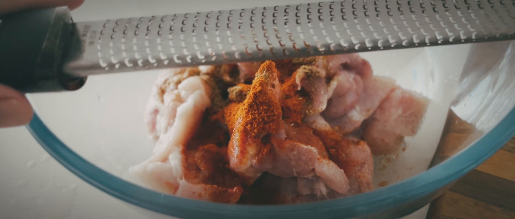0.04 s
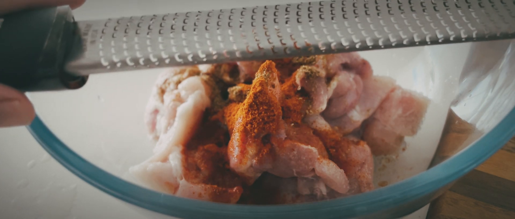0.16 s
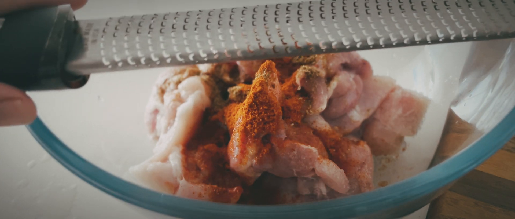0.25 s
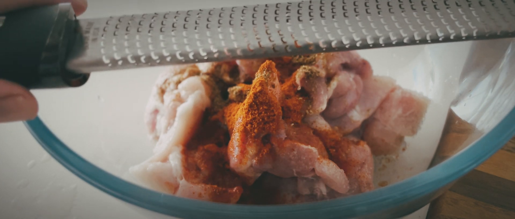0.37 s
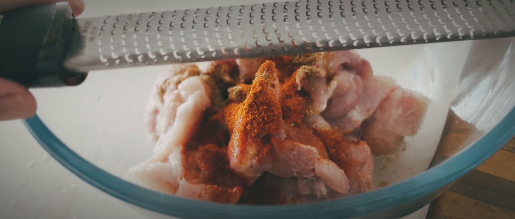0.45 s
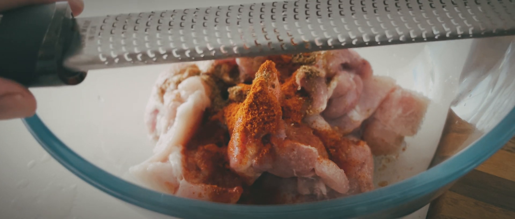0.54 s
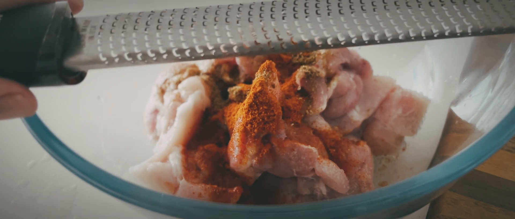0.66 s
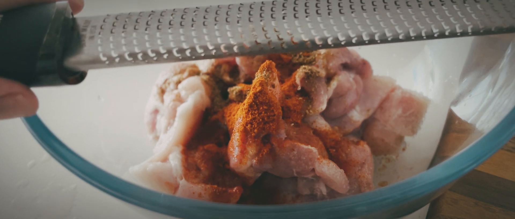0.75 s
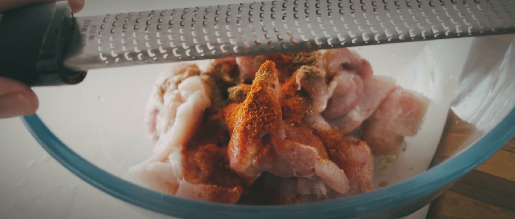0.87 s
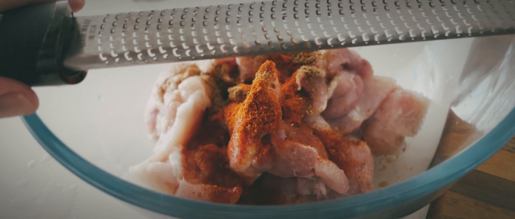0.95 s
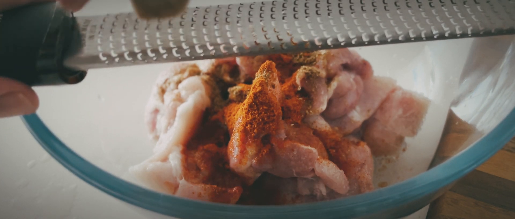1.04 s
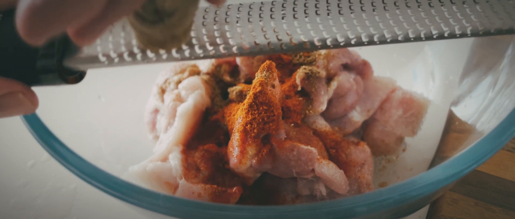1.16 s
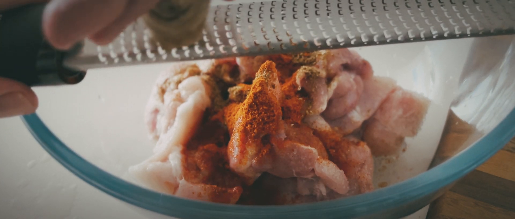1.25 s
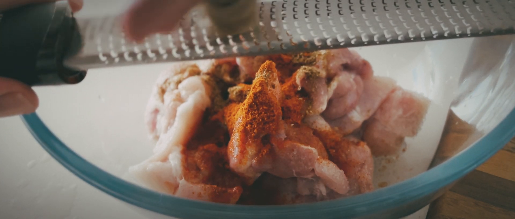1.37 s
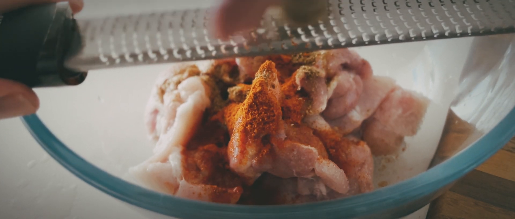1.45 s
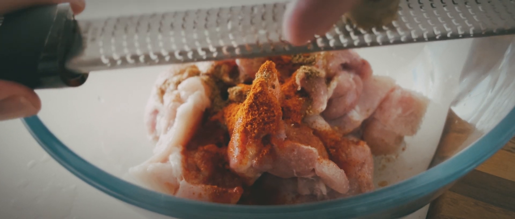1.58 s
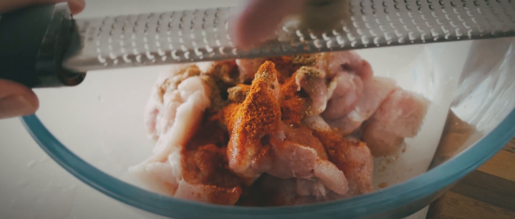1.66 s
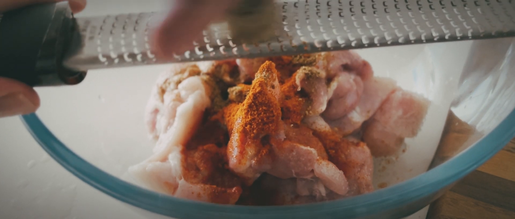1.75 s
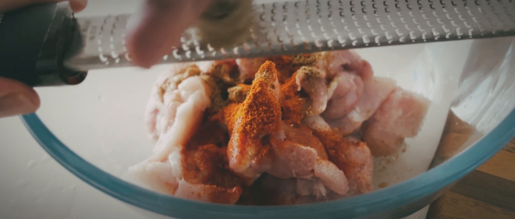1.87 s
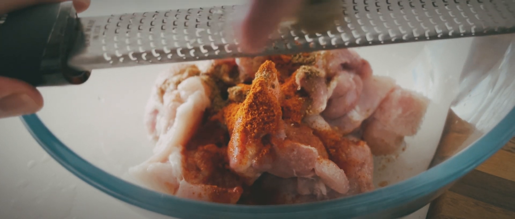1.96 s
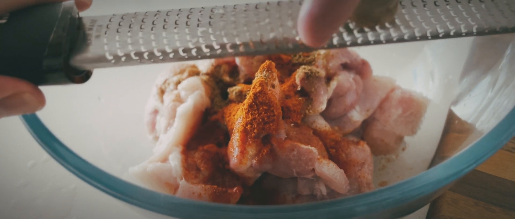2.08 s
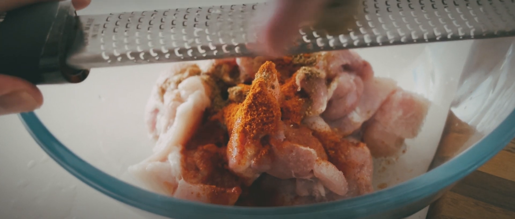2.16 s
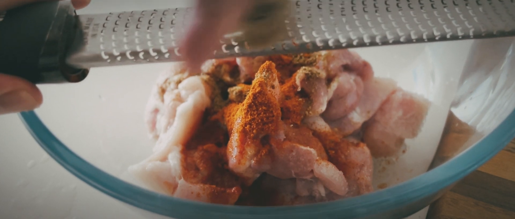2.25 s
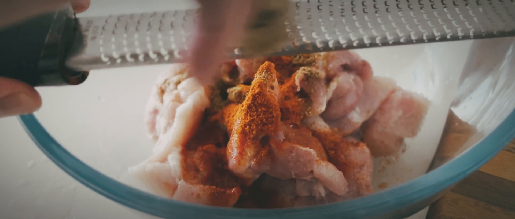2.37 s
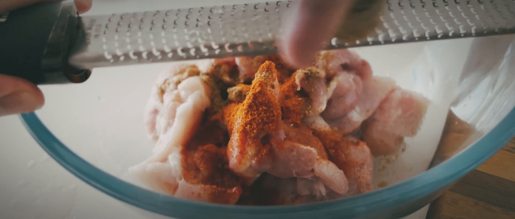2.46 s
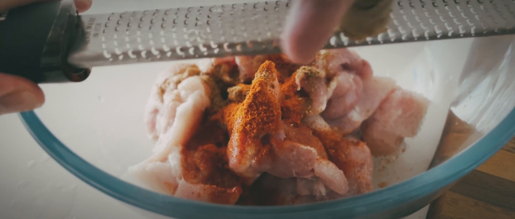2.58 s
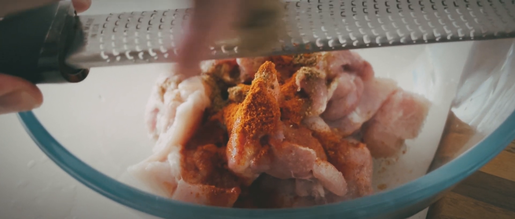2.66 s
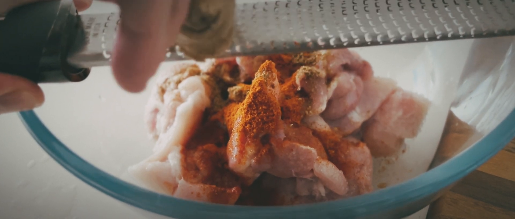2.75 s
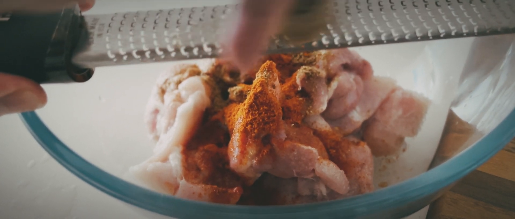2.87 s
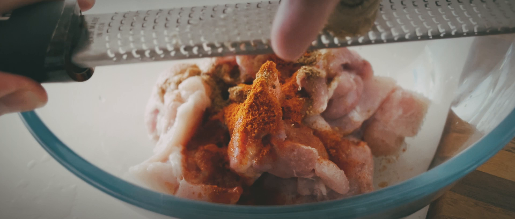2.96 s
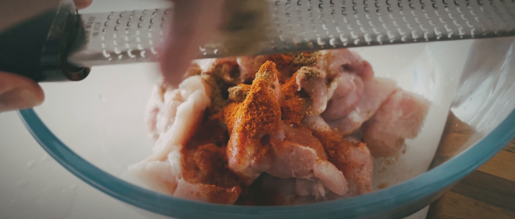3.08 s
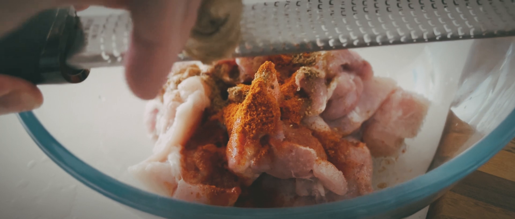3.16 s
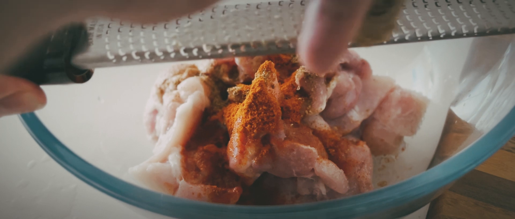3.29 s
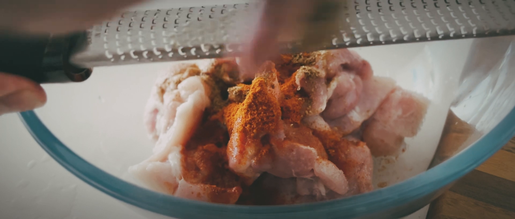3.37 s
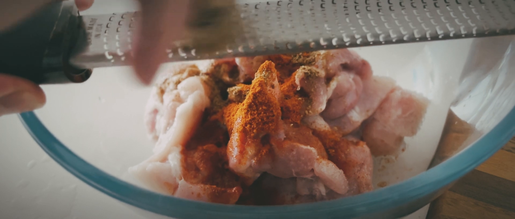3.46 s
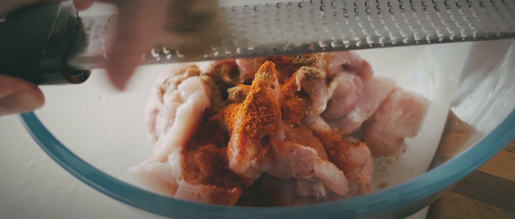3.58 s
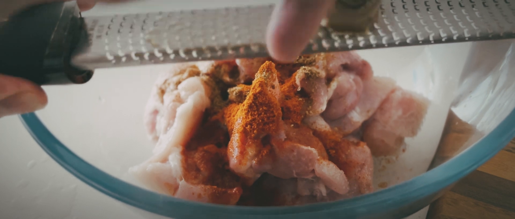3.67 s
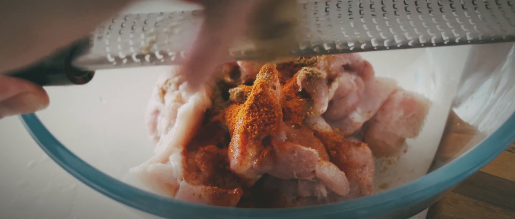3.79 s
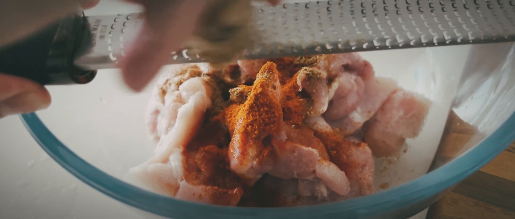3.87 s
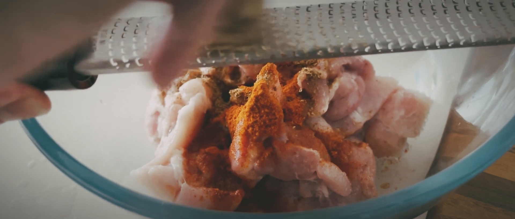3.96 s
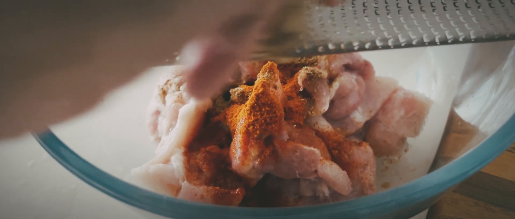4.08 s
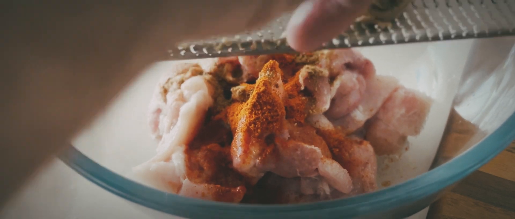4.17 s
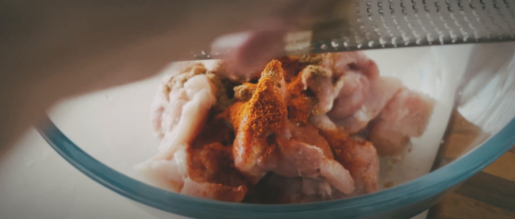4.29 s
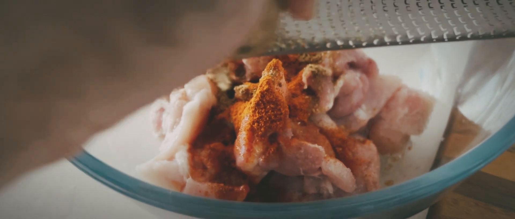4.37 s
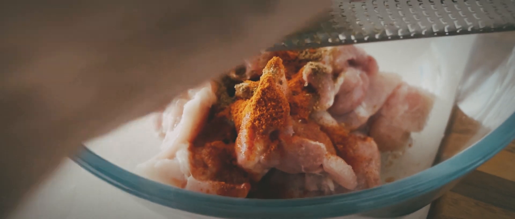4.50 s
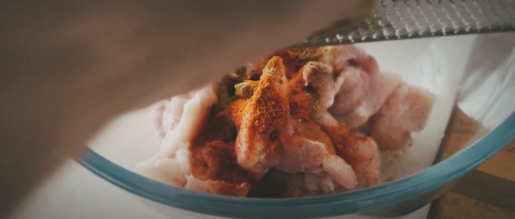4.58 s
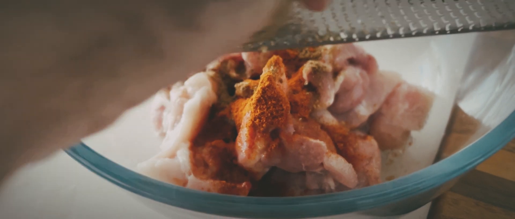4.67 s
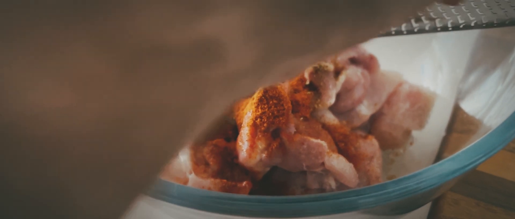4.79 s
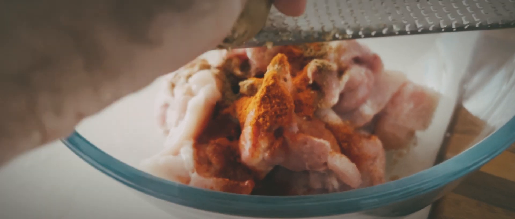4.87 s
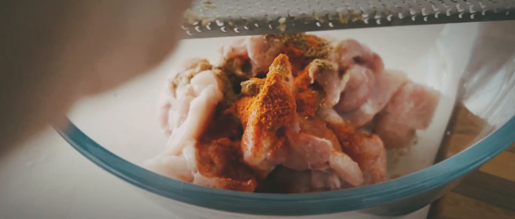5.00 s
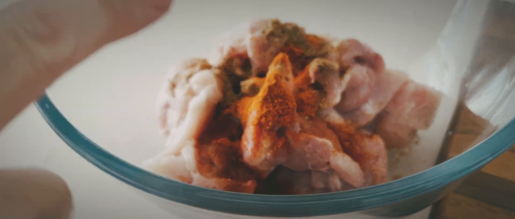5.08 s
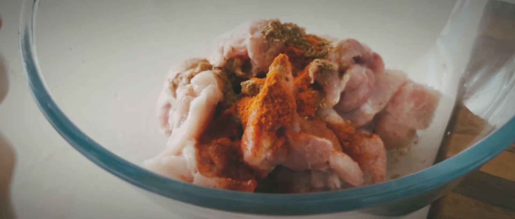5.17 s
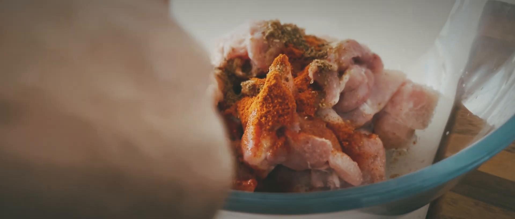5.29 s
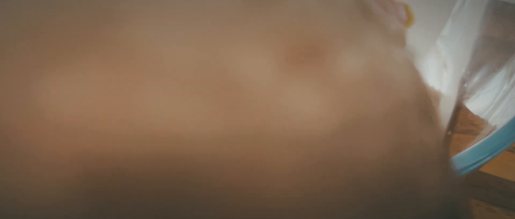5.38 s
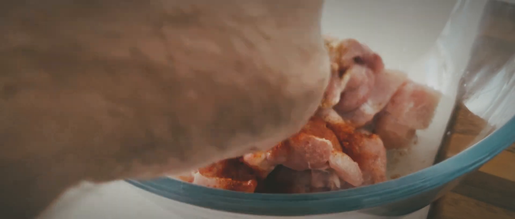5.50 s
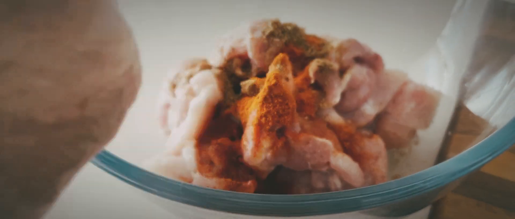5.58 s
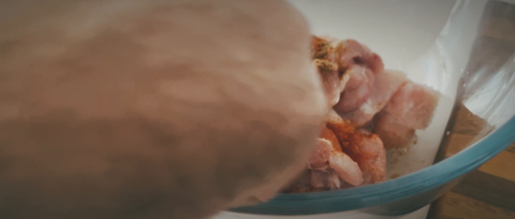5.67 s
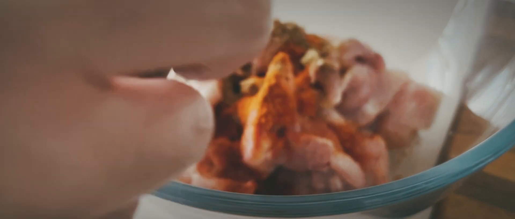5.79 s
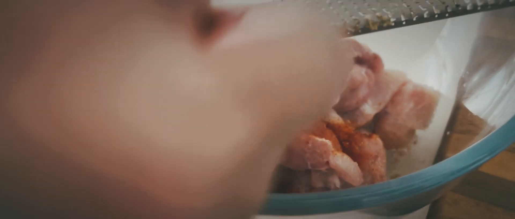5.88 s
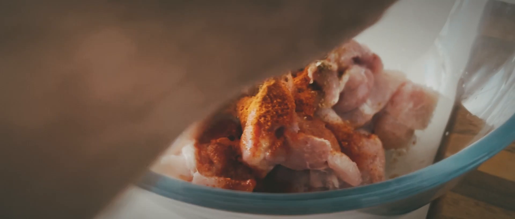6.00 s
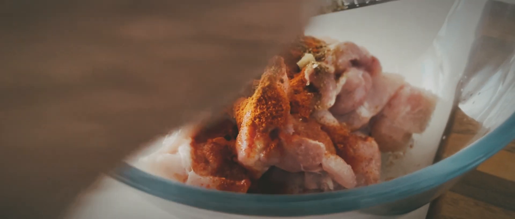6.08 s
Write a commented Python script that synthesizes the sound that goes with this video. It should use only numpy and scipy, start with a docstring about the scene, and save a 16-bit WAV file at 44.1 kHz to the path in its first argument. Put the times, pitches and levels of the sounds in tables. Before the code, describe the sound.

A quiet kitchen, heard close in stereo with short reflections and a steady low room rumble. For the first second there is little more than faint brushing and a tiny knock near 0.8. Light contacts at 1.2-1.3 lead into four slow, bright, fibrous rasps of ginger on a fine metal grater, at about 1.5, 2.0, 2.4 and 2.9, with weaker return slides. Hard hollow knocks at 1.6, 1.7, 1.9, 2.2, 2.4 and 2.7 leave a brief metallic rattle and low thrum. From 2.9 the rubbing becomes a rapid flurry, about ten strokes a second, with juddering and dense knocks; it softens towards 3.8, surges near 4.1, and closes in a faster shake up to 5.0. It stops suddenly. Small dry ticks follow at 5.2-5.8, some clustered. Around 5.9 the rasp touches the bowl with a soft ring, and gentle quick rubbing restarts at 6.0 until the end.

```python
"""Fresh ginger brushes a long fine rasp over a glass bowl, with soft knocks, and is then rubbed slowly back and forth.
A quick flurry follows: teeth tear the fibres (clicks made into hiss), the root judders (runs of uneven slips)
and the rasp knocks hollowly (short pushes that bend it and set it ringing).
In a pause a few small ticks are heard (short noise bursts), and the rasp touches the bowl with a soft ring.
The rubbing starts again; a low room rumble (shaped noise) lies under everything."""
import sys
import numpy as np
from scipy import signal
from scipy.fft import rfft, irfft
from scipy.io import wavfile
from scipy.ndimage import uniform_filter1d, minimum_filter1d

SR = 44100
rng = np.random.default_rng(int(sys.argv[2]) if len(sys.argv) > 2 else 0)


def waveform_to_disk(signal):
    """Save audio, clipped to [-1, 1], as 16-bit WAV at the path in sys.argv[1]."""
    frames = np.transpose(np.atleast_2d(signal))
    scaled = np.clip(frames, -1, 1) * 32767
    samples = np.round(scaled).astype(np.int16)
    wavfile.write(sys.argv[1], SR, samples)


N = 270774


# Levels in the tables are relative; the functions and scene() add shared trims.

# how the root bears on the rasp: (time [s], body drone level re hiss [dB], treble up and the rest down by [dB])
ROOT_BEARING = [(0, 44.5, 32.5), (1.45, 0, 2), (2.0, 7, 1), (2.85, -1.5, -1), (3.1, 3.5, 0.5),
                (4.0, 7.5, 0), (5.0, 16, -1.5), (5.6, -1.5, -2), (6.14, 20, -12)]
# tough fibres that snap singly: (time [s], level re hiss [dB])
FIBRE_SNAPS = [(2.6, -10), (3.1, -7.5), (5.0, -8.5)]
# colour of the tearing: (frequency [Hz], level [dB per Hz])
TEARING_COLOUR = [(900, 0.5), (1450, -14), (1700, -4.5), (2000, -7), (2400, 2.5), (3100, -5), (3700, 5.5),
                  (4000, 10), (4350, -5), (5000, 3.5), (5950, -3), (6700, 5), (7700, 0), (8600, 1.5),
                  (10400, -2), (11200, -1), (12200, -4.5), (16000, -4)]
# ringing of the thin steel blade, also used by small_sounds(): (frequency [Hz], level [dB], t60 [s])
BLADE_MODES = [(908, 5, 0.085), (1641, 6.5, 0.12), (2567, 7, 0.13), (3640, 10.5, 0.076),
               (3950, 12.5, 0.018), (4850, 6, 0.057), (6640, 4, .04), (6520, -3.5, 0.035),
               (7610, 17, 0.026), (9000, 9, 0.037)]
# bending of the hand-held rasp, also used by contact() and knocks(): (frequency [Hz], level [dB], t60 [s])
BODY_MODES = [(236.6, -20, 0.076), (385, -13, 0.12), (509.2, 11.5, 0.038), (614, -2.5, 0.16),
              (781, -13.5, 0.26), (835, 1, 0.14), (1100, -16, 0.078), (1062, -2.5, 0.21),
              (1438, -13.5, 0.29), (1685, -12, 0.27), (2100, -35.5, 0.056)]
# the root damps the blade: its ring grows more slowly than the hiss, and its pitch wavers under the moving load
BLADE_DB, BLADE_REF_DB = -13, -50   # ring re hiss, for a hiss at the reference level
BLADE_FOLLOWS, BLADE_WAVER = 0.66, .007   # share of the hiss swing [of dB]; share of pitch
PLATE_DB, PLATE_T60_S = 1.5, 0.019   # countless high modes of the toothed sheet, re the plain hiss
BITE_DB, TOOTH_DB = 2, -0.5   # unevenness from row to row and from tooth to tooth


def rasping():
    """Teeth cut thousands of fibres a second; the cuts hiss and shake the blade and the body."""
    t = np.arange(N) / SR
    effort = stroke_effort(t)
    # the root bites unevenly as it passes the rows of teeth
    bite = from_db(BITE_DB * drift(rate=140) + TOOTH_DB * drift(rate=900))
    cuts = rms_one(grains(per_s=6000, spread_db=1.0, size=(3, N))) * bite
    snap_db, = in_time(FIBRE_SNAPS)
    snaps = from_db(snap_db) * rms_one(grains(per_s=110, spread_db=2.5, size=N))
    # rows: direct, left reflections, right reflections; snaps are in the direct sound only
    torn = rms_one(colour(cuts + snaps * [[1], [0], [0]], TEARING_COLOUR))
    sheet = rng.standard_normal((3, SR // 10)) * dying(t[:SR // 10], PLATE_T60_S)
    plate = rms_one(signal.fftconvolve(torn, sheet, axes=1)[:, :N])
    hiss = rms_one(torn + from_db(PLATE_DB) * plate)

    # reading the ring at a wavering pace makes its pitch waver
    loaded = t + BLADE_WAVER * np.cumsum(drift(rate=8.6)) / SR
    steady_ring = ring(cuts, BLADE_MODES, sustain=2.4)
    blade = rms_one(np.array([np.interp(loaded, t, row) for row in steady_ring]))
    freedom = np.maximum(effort / from_db(BLADE_REF_DB), .5) ** (BLADE_FOLLOWS - 1)
    hiss = hiss + from_db(BLADE_DB) * freedom * blade
    hiss[1:] *= from_db(1.0)   # the reflected hiss, left and right

    drone_db, tilt_db = in_time(ROOT_BEARING)
    dull = signal.sosfilt(signal.butter(1, 6000, fs=SR, output="sos"), hiss)
    hiss = dull * from_db(-tilt_db) + (hiss - dull) * from_db(tilt_db)

    shudder = np.array([grains(per_s=1300, spread_db=0, size=N) for side in range(2)])
    drone = diffuse(rms_one(ring(shudder, BODY_MODES, sustain=0.91)))
    return from_db(-3.0) * effort * hiss, effort * from_db(drone_db - 8.5) * drone


def stroke_effort(t):
    """Each pass over the teeth swells and fades; overlapping passes add as power."""
    power = np.zeros(N)
    for s, length, db in strokes():
        near = slice(max(int((s - 3 * length) * SR), 0), int((s + 3 * length) * SR))
        away = 2 * (t[near] - s) / length
        power[near] += from_db(db) ** 2 / (1 + away ** 4 / 4) ** 3
    return np.sqrt(power)


# slow, long pushes along the rasp: (middle time [s], length [s], hiss level [dB])
LONG_PUSHES = [(1.461, 0.13, -42.5), (1.961, 0.13, -42), (2.425, 0.1, -41.5), (2.856, 0.1, -41.5)]
# light brushes of root and fingers over the teeth: (middle time [s], length [s], hiss level [dB])
LIGHT_BRUSHES = [(0.53, 0.094, -89.5), (1.042, 0.065, -91), (1.226, 0.039, -61), (1.34, 0.11, -51),
                 (5.126, 0.018, -79), (5.202, 0.012, -69.5), (5.41, 0.022, -75), (5.631, 0.014, -68),
                 (5.69, 0.053, -78), (5.771, 0.015, -65), (5.823, 0.008, -68), (5.864, 0.014, -66),
                 (6.097, 0.095, -64)]
# quick rubbing, about ten strokes a second, then a closing shake at about twice the pace: (time [s], strokes done)
FLURRY_PACE = [(2.906, 0), (4.095, 12), (4.309, 14), (4.608, 17), (4.987, 24)]
# the rubbing starts again: (time [s], strokes done)
RESTART_PACE = [(5.994, 0), (6.117, 3)]
SLOW_RETURN_S, SLOW_RETURN_LOSS_DB = 0.11, 12.5   # the root slides back lightly between two pushes
SLOW_RETURN_LEAD_S = 0.005   # a little before halfway: the hand rests before it pushes again


def strokes():
    """The hand pushes, slides back lightly and brushes: (middle s, length s, hiss dB)."""
    slow_returns = []
    for (s, length, db), following in zip(LONG_PUSHES, LONG_PUSHES[1:]):
        middle = (s + following[0]) / 2 - SLOW_RETURN_LEAD_S
        slow_returns.append((middle, SLOW_RETURN_S, db - SLOW_RETURN_LOSS_DB))
    quick = [*quick_strokes(FLURRY_PACE), *quick_strokes(RESTART_PACE)]
    return [*LONG_PUSHES, *slow_returns, *quick, *LIGHT_BRUSHES]


# how hard the quick pushes press: the pressure falls, rises again near 4.1 s and falls; the restart is gentle:
# (time [s], level [dB])
PUSH_PRESSURE = [(2.9, -42.5), (3.45, -47), (3.8, -49), (4.1, -42.5), (4.35, -49), (4.65, -46.5),
                 (5.0, -49.5), (5.99, -68), (6.12, -55.5)]
PUSH_SHARE, RETURN_SHARE = 0.3, 0.28   # lengths of a quick push and its return, as shares of the cycle
QUICK_RETURN_LOSS_DB, PUSH_SCATTER_DB = 10.5, 4


def quick_strokes(bout):
    """Pushes at the pace of the hand, a light return between each two; faster strokes are shorter."""
    s, done = np.transpose(bout)
    at = np.interp(np.arange(done[-1] + 1), done, s)
    level_db = np.interp(at, *np.transpose(PUSH_PRESSURE))
    level_db = level_db + PUSH_SCATTER_DB * rng.standard_normal(len(at))
    cycle = np.diff(at)
    pushes = zip(at, PUSH_SHARE * np.gradient(at), level_db)
    returns = zip(at[:-1] + cycle / 2, RETURN_SHARE * cycle, level_db - QUICK_RETURN_LOSS_DB)
    return [*pushes, *returns]


# the rasp knocks, sometimes catching twice:
# (time [s], contact length [s], level [dB], pitch [Hz], ring of the modes re the thud [dB])
RASP_KNOCKS = [(0.768, 0.0021, -57, 890, -16), (1.184, 0.017, -51.5, 510, -5), (1.327, 0.004, -42, 565, 2),
               (1.5676, 0.00073, -14, 673, -20), (1.6952, 0.00067, -19, 722, -12.5),
               (1.8689, 0.0019, -18, 732, -0.5), (2.202, 0.002, -23.5, 710, -7),
               (2.4106, 0.0029, -20, 735, -10), (2.7225, 0.0038, -29, 667, -17),
               (3.0042, 0.0026, -25.5, 760, -10), (3.189, 0.0046, -18, 908, -12.5),
               (3.2956, 0.0025, -30, 684, -40), (3.3322, 0.0032, -26.5, 793, -12),
               (3.4882, 0.0017, -23.5, 690, -11), (3.5177, 0.0068, -21.5, 620, -28),
               (3.613, 0.0065, -25, 780, -17.5), (3.696, 0.015, -46, 354, -12),
               (3.8565, 0.0036, -37, 960, -34), (3.885, 0.009, -24, 753, -11.5),
               (3.988, 0.0012, -21.5, 862, -22.5), (4.041, 0.0084, -40, 617, -14),
               (4.082, 0.0051, -21.5, 746, -6), (4.0924, 0.0016, -27.5, 650, -25),
               (4.3254, 0.0069, -27.5, 690, -10), (4.4887, 0.0062, -25.5, 700, -16),
               (4.606, 0.0021, -48.5, 830, 4), (4.6486, 0.0078, -19, 754, -7.5),
               (4.659, .005, -27, 600, -13), (4.718, 0.0026, -23, 850, -28),
               (4.7638, 0.0023, -22.5, 770, -25), (4.983, 0.0063, -20.5, 760, -33),
               (4.992, 0.0023, -24, 726, -23.5), (5.914, 0.0092, -44, 390, -7),
               (5.9855, 0.01, -37.5, 470, -28), (6.064, 0.0043, -39, 630, -18)]
# length of the ring after a knock, shorter once the quick rubbing starts: (time [s], ring t60 [s])
KNOCK_RING = [(1.57, 0.56), (2.72, 1), (3.0, 0.28), (4.7, 0.16), (5.0, 0.13)]
# loose rattle of the rasp after a knock: (frequency [Hz], level [dB per Hz])
RATTLE_COLOUR = [(25, -54), (130, -14), (260, -4), (370, -8), (520, 1.5), (680, 0), (850, 1.5), (1050, -2),
                 (1300, -10.5), (1550, -6.5), (2100, -18.5), (3000, -23.5), (5000, -45), (16000, -65)]
RATTLE_DB, RATTLE_BUILD_S = 2.5, 0.006   # re the ringing modes; takes over as the first swings die
KNOCK_BURST_DB = -16.5   # re the contact, at BURST_REF_HZ


def knocks():
    """A sharp blow, a short chatter, then a ring and rattle, shorter once the quick rubbing starts."""
    blows, tails = np.zeros((3, N)), np.zeros((2, N))
    t = np.arange(SR // 2) / SR
    for s, length, db, pitch_hz, ring_db in RASP_KNOCKS:
        t60 = np.interp(s, *np.transpose(KNOCK_RING))
        burst_db = KNOCK_BURST_DB + hardness_db(pitch_hz)
        chatter = grains(per_s=4500, spread_db=5.0, size=len(t)) * np.exp(-(t / length) ** 2)
        # the blow itself is one push; a longer contact adds more chatter behind it
        force = (length / 0.0082) ** 2.13 * chatter / (np.linalg.norm(chatter) + 1e-9)
        force[0] += 1
        grit = rng.standard_normal(len(t)) * np.exp(-t / (length + 0.00047))
        blow = contact(force, grit, length, db, pitch_hz, ring_db, burst_db, sharp=True)
        add(blows, s, kitchen(blow, t60=0.05, wet_db=-5))

        shiver = rms_one(ring(rng.standard_normal((2, len(t))), BODY_MODES, sustain=2.4))
        rattle = rms_one(colour(grains(per_s=850, spread_db=1.0, size=(2, len(t))), RATTLE_COLOUR))
        fade = dying(t, t60) * np.minimum(t / RATTLE_BUILD_S, 1)
        add(tails, s, from_db(db - 19) * (shiver + from_db(RATTLE_DB) * rattle) * fade)
    return blows, diffuse(tails)


# the root sticks and slips: (time [s], length [s], level [dB], pitch [Hz])
ROOT_JUDDERS = [(3.087, 0.018, -37, 587), (3.114, 0.048, -29.5, 816), (3.320, 0.027, -25.5, 790),
                (3.394, 0.038, -31, 790), (3.596, 0.029, -24, 790), (3.634, 0.049, -32.5, 750),
                (3.775, 0.037, -32.5, 720), (3.839, 0.037, -36, 760), (3.87, 0.048, -26, 864),
                (3.923, 0.016, -37.5, 780), (3.949, 0.028, -35, 730), (4.166, 0.053, -32, 810),
                (4.315, 0.017, -36.5, 744), (4.346, 0.038, -43, 580), (4.375, 0.025, -31.5, 660),
                (4.774, 0.022, -32, 724), (4.821, 0.037, -32, 900), (4.871, 0.029, -27.5, 790),
                (4.922, 0.032, -24.5, 840), (4.983, 0.014, -35, 853), (5.852, 0.016, -50, 424),
                (6.025, 0.06, -47.5, 500), (6.049, 0.017, -38, 654), (6.089, 0.029, -35, 660),
                (6.108, 0.085, -40.5, 620)]
JUDDER_RING_DB, JUDDER_BURST_DB = -15, -56   # modes re the thud; burst re the contact, at BURST_REF_HZ


def judders():
    """A run of uneven slips swells and fades as the root drags over the teeth."""
    out, t = np.zeros((3, N)), np.arange(SR // 5) / SR
    for s, length, db, pitch_hz in ROOT_JUDDERS:
        burst_db = JUDDER_BURST_DB + hardness_db(pitch_hz)
        age = t / (0.46 * length)
        force = grains(per_s=1300, spread_db=4.5, size=len(t)) * age * np.exp(-age ** 2)
        slips = contact(force, force, length, db, pitch_hz, JUDDER_RING_DB, burst_db, sharp=False)
        add(out, s, kitchen(slips, t60=0.085))
    return out


# dead thud of a contact pitched at THUD_REF_HZ; it shifts with the pitch: (frequency [Hz], level [dB per Hz])
THUD_COLOUR = [(25, -72), (60, -27), (150, -28), (340, -2), (500, 4), (640, 7), (900, -1.5), (1150, -3),
               (1370, -7), (1700, -11.5), (2100, -19.5), (3000, -27.5), (5000, -32), (16000, -82.5)]
# noisy burst of a contact, strongest near 900 Hz: (frequency [Hz], level [dB per Hz])
BURST_COLOUR = [(50, -27), (900, 24), (1700, -3.5), (2400, 6.5), (3200, -1.5), (4500, -11.5), (8000, -4),
                (12000, -16), (16000, -17)]
# the whole rasp sways on its handle: (frequency [Hz], level [dB], t60 [s])
SWAY_MODES = [(70, -21, 0.11), (126, -2.5, 0.028), (198, -8.5, 0.14), (260.3, 8.5, 0.057)]
THUD_REF_HZ = 750
KNOCK_THUD_DB, KNOCK_MODES_DB = -4, -1   # thud with modes re the swings; extra trim of a knock's modes


def contact(force, grit, length, db, pitch_hz, ring_db, burst_db, sharp):
    """A force gives a thud and a noisy burst and sets modes ringing; a sharp one also bends the rasp."""
    touch = int((length + .008) * SR)

    def level(x):
        """Give the touch itself, without its tail, a strength of one."""
        return x / np.sqrt(np.mean(x[:touch] ** 2) + 1e-20)

    shifted = [(hz * pitch_hz / THUD_REF_HZ, level_db) for hz, level_db in THUD_COLOUR]
    thud = colour(force, shifted)
    modes = ring(force, struck(BODY_MODES, detune=.015, spread_db=2.0))
    blow = level(thud) + from_db(ring_db + sharp * KNOCK_MODES_DB) * level(modes)
    blow = disperse(blow, 650, width_hz=700)
    blow = level(disperse(blow, 1100, width_hz=600))
    if sharp:
        bent = level(swings(force, pitch_hz, ring_db))
        blow = level(bent + from_db(KNOCK_THUD_DB) * blow)
    burst = level(colour(grit, BURST_COLOUR))
    sway = level(resonance(ring(force, SWAY_MODES), 140, width_hz=340))
    # a longer push sways the whole rasp more
    sway_db = -17 + 2.0 * np.log2(np.clip(length, .002, .016) / 0.003)
    return from_db(db) * (blow + from_db(burst_db) * burst + from_db(sway_db) * sway)


# start as a multiple of the contact pitch; the swings settle on the main bending mode
SWING_START, SWING_END_HZ, SWING_SINK_S = 1.875, 518.6, 0.001838
SWING_RISE_S, SWING_T60_S, SWING_RING_T60_S = 0.0011, 0.014, .12


def swings(force, pitch_hz, ring_db):
    """Each push bends the rasp; fast waves arrive first, so the swings sink in pitch and then ring on."""
    t = np.arange(len(force)) / SR
    hz = SWING_END_HZ + (SWING_START * pitch_hz - SWING_END_HZ) * np.exp(-t / SWING_SINK_S)
    rise = 1 - np.exp(-(t / SWING_RISE_S) ** 2)
    fade = dying(t, SWING_T60_S) + from_db(ring_db - 6.5) * dying(t, SWING_RING_T60_S)
    swing = -rise * fade * np.sin(2 * np.pi * np.cumsum(hz) / SR)
    return signal.fftconvolve(force, swing)[:len(t)]


BURST_DB_PER_OCTAVE, BURST_REF_HZ = 22.5, 700


def hardness_db(pitch_hz):
    """A higher-pitched contact is a harder one, and its noisy burst is stronger."""
    return BURST_DB_PER_OCTAVE * np.log2(pitch_hz / BURST_REF_HZ)


# the blade rings, flicked by a tooth or bumped softly as it is set down:
# (time [s], level [dB], contact brightness [Hz])
BLADE_PINGS = [(1.822, -45.5, 11820), (2.038, -43, 8040), (2.115, -45.5, 12000), (2.17, -48, 7000),
               (2.793, -36, 9700), (2.934, -46.5, 10560), (5.868, -38.5, 1530), (5.911, -28.5, 1210),
               (5.988, -30.5, 1210)]
# short bright ticks, some at the onset of knocks: (time [s], peak level [dB], pitch [Hz], t60 [s])
SHORT_TICKS = [(0.764, -48, 2000, 0.17), (0.764, -44.5, 7100, .008), (1.131, -61, 5000, 0.013),
               (3.187, -25.5, 7900, 0.011), (4.7197, -24.5, 8300, 0.0094), (4.763, -25, 8100, 0.0051),
               (4.98, -29, 7970, .02), (5.2343, -42, 984, 0.059), (5.2345, -59, 5070, 0.013),
               (5.322, -39, 6860, 0.0061), (5.565, -33.5, 6540, 0.02), (5.628, -42.5, 4800, 0.034),
               (5.644, -49, 5170, 0.034), (5.663, -51, 4200, .025), (5.676, -46.5, 5030, 0.028),
               (5.709, -52, 3960, 0.041), (5.764, -48, 5400, 0.06)]


def small_sounds():
    """A short smooth push makes the blade ring; the ticks are dying bursts of pitched noise."""
    out, t = np.zeros((3, N)), np.arange(SR // 4) / SR
    for s, db, bright_hz in BLADE_PINGS:
        touch = np.exp(-(np.pi * (bright_hz * t - 1)) ** 2)
        note = ring(touch / touch.sum(), struck(BLADE_MODES, detune=.002, spread_db=1.5))
        add(out, s, kitchen(from_db(db - 11.5) * note, t60=0.042))
    for s, db, pitch_hz, t60 in SHORT_TICKS:
        noise = rng.standard_normal(len(t)) * dying(t, t60)
        tick = resonance(noise, pitch_hz, width_hz=.28 * pitch_hz)
        add(out, s, kitchen(from_db(db - 8.0) * tick / np.abs(tick).max(), t60=0.005))
    return out


# low thrum of the hand-held rasp: (time [s], level [dB])
THRUM_LEVEL = [(0, -68), (1.12, -69.5), (1.4, -57.5), (2.8, -57), (3.5, -61), (4.86, -55.5), (5.0, -74.5),
               (5.75, -74.5), (5.98, -64), (6.04, -56), (6.14, -49)]


def thrum():
    """Random shaking makes the lowest modes of the rasp and its handle hum as the hand works."""
    level_db, = in_time(THRUM_LEVEL)
    shake = rng.standard_normal((2, N))
    upper_hum = resonance(shake, 241.3, width_hz=26.3)
    lower_hum = from_db(-9.0) * resonance(shake, 130.6, width_hz=41)
    band = signal.butter(2, [70, 380], "band", fs=SR, output="sos")
    hum = signal.sosfilt(band, upper_hum + lower_hum)
    return from_db(level_db + 6.5) * diffuse(rms_one(hum))


# colour of the room rumble: (frequency [Hz], level [dB per Hz])
ROOM_COLOUR = [(15, -64.5), (25, -25), (92, -19.5), (114, -8.5), (161, -9.5), (249, -15), (416, -21.5),
               (641, -25), (1190, -31.5), (1290, -32.5), (2220, -43), (2480, -46.5), (2690, -45),
               (6740, -53.5), (16000, -60.5)]
ROOM_DB = -62


def room_rumble():
    """Steady noise, strongest in the bass, arrives from all around."""
    noise = rng.standard_normal((2, N))
    return from_db(ROOM_DB) * diffuse(rms_one(colour(noise, ROOM_COLOUR)))


def kitchen(x, t60, wet_db=-3):
    """Rows: the direct sound, then left and right reflections from bowl, hands and worktop, new every time."""
    t = np.arange(SR // 5) / SR
    response = rng.standard_normal((2, len(t))) * dying(t, t60) * np.minimum(t / 0.0015, 1) ** 2
    response /= np.sqrt(np.sum(response ** 2, axis=1, keepdims=True))
    reflections = signal.fftconvolve(x[None], response, axes=1)[:, :len(x)]
    return np.vstack([x, from_db(wet_db) * reflections])


# likeness of left and right in sound from all around: (frequency [Hz], likeness [0 to 1])
SIDE_LIKENESS = [(60, 0.98), (150, 0.89), (300, 0.61), (600, 0.047), (1500, 0.086), (16000, 0.048)]


def diffuse(pair):
    """Two unrelated signals become alike in the bass, as sound from all around does."""
    alike = np.clip(at_hz(SIDE_LIKENESS, np.fft.rfftfreq(N, 1 / SR)), -1, 1)
    mid, side = rfft(pair)
    return irfft(np.sqrt((1 + alike) / 2) * mid + np.sqrt((1 - alike) / 2) * side * [[1], [-1]], N)


# phase between the two microphone ports: (frequency [Hz], left leads by [radians])
PHASE_LEAD = [(0, 0), (450, .1), (630, 1.4), (800, 1.2), (1050, 1.3), (1350, 3), (1600, 5.5), (2200, 6.3),
              (4000, 7.2), (5200, 5.2), (6900, 3.2), (9000, 0), (12000, -2.1), (15500, -2.4)]
# balance of the two ports: (frequency [Hz], left minus right level [dB])
LEFT_RIGHT = [(100, -.5), (260, 0), (380, -3.5), (600, 2), (800, 2.5), (1200, 2), (1650, -1), (2200, 3),
              (5000, 4), (6400, 3), (7200, -1.5), (8500, 0), (15000, 0)]


def ports(x):
    """Direct sound reaches the two microphone ports with different phase and level."""
    hz = np.fft.rfftfreq(N, 1 / SR)
    half = np.array([[.5], [-.5]])   # each side takes half the difference
    level = from_db(half * at_hz(LEFT_RIGHT, hz))
    turn = np.exp(1j * half * np.interp(hz, *np.transpose(PHASE_LEAD)))
    return irfft(rfft(x) * level * turn, N)


def from_db(db):
    """Turn decibels into a plain multiplier."""
    return 10 ** (np.asarray(db) / 20)


def rms_one(x):
    """Scale to an average strength (RMS) of one."""
    return x / np.sqrt(np.mean(x ** 2) + 1e-20)


def in_time(rows):
    """Each column of a curve at every sample."""
    s, *columns = np.transpose(rows)
    return [np.interp(np.arange(N) / SR, s, c) for c in columns]


def at_hz(points, hz):
    """Read a table on a log-frequency axis."""
    f, value = np.transpose(points)
    return np.interp(np.log(hz + 1), np.log(f + 1), value)


def colour(x, spectrum):
    """Filter with the given spectrum that never sounds ahead of its input (minimum phase)."""
    size = 2048
    gain = from_db(at_hz(spectrum, np.fft.rfftfreq(size, 1 / SR)))
    cepstrum = irfft(np.log(gain))
    # folding the second half onto the first gives the minimum phase
    cepstrum[1:size // 2] *= 2
    cepstrum[size // 2 + 1:] = 0
    response = irfft(np.exp(rfft(cepstrum)))
    response = response.reshape((1,) * (x.ndim - 1) + (-1,))
    return signal.fftconvolve(x, response, axes=-1)[..., :x.shape[-1]]


def resonance(x, hz, width_hz):
    """One resonance with gain 1 on top."""
    r = np.exp(-np.pi * width_hz / SR)
    poles = [1, -2 * r * np.cos(2 * np.pi * hz / SR), r * r]
    return signal.lfilter((1 - r * r) / 2 * np.array([1, 0, -1]), poles, x + 1e-18)


def ring(x, modes, sustain=1):
    """Modes in parallel; a unit click starts each at its own level, and sustain stretches every t60."""
    out = 0
    for hz, db, t60 in modes:
        r = from_db(-60 / (t60 * sustain * SR))
        poles = [1, -2 * r * np.cos(2 * np.pi * hz / SR), r * r]
        out = out + from_db(db) * signal.lfilter([.5, 0, -.5], poles, x + 1e-18)
    return out


def struck(modes, detune, spread_db):
    """Each touch lands on a new spot, which detunes and rebalances the modes a little."""
    chance = rng.standard_normal((len(modes), 2))
    return [(hz * (1 + detune * a), db + spread_db * b, t60)
            for (hz, db, t60), (a, b) in zip(modes, chance)]


def disperse(x, hz, width_hz):
    """Bending waves near one pitch arrive late, so a push becomes a few swings."""
    r = np.exp(-np.pi * width_hz / SR)
    poles = [1, -2 * r * np.cos(2 * np.pi * hz / SR), r * r]
    return signal.lfilter(poles[::-1], poles, x + 1e-18)


def dying(t, t60):
    """Fade that falls by 60 dB in t60 seconds."""
    return np.exp(-np.log(1000) * t / t60)


def grains(per_s, spread_db, size):
    """Random clicks of uneven strength and either sign."""
    strength = from_db(spread_db * np.minimum(rng.exponential(1, size), 4))
    sign = rng.choice([-1, 1], size)
    return strength * sign * (rng.random(size) < per_s / SR)


def drift(rate):
    """Random wander between rate new values a second, joined by straight lines; RMS 1."""
    knots = rng.standard_normal(12000)
    return rms_one(np.interp(np.arange(N) / SR * rate, np.arange(len(knots)), knots))


def add(track, s, sound):
    """Mix a sound in at time s."""
    start = max(round(s * SR), 0)
    track[..., start:start + sound.shape[-1]] += sound[..., :max(N - start, 0)]


def scene():
    """Mix the direct sounds and their reflections with the ringing, thrum and rumble from all around."""
    blows, tails = knocks()
    tearing, drone = rasping()
    sound = tearing + blows + from_db(-4.5) * judders() + small_sounds()
    near = from_db(-3.0) * (ports(sound[0]) + diffuse(sound[1:]))
    return near + tails + drone + thrum() + room_rumble()


CEILING_DB, CUTOFF_HZ = -11.5, 16000   # limiter ceiling re full scale; top of the treble


def record(dry):
    """The deepest bass is rolled off, a fast limiter holds loud peaks down, the top is cut steeply."""
    x = signal.sosfilt(signal.butter(2, 46, "high", fs=SR, output="sos"), dry)
    allowed = np.minimum(1, from_db(CEILING_DB) / (np.abs(x).max(axis=0) + 1e-9))
    gain = uniform_filter1d(minimum_filter1d(allowed, size=101), size=101)
    top_cut = signal.ellip(12, .2, 70, CUTOFF_HZ, fs=SR, output="sos")
    return signal.sosfilt(top_cut, x * gain)


dry = scene()
out = record(dry)
waveform_to_disk(out)
```